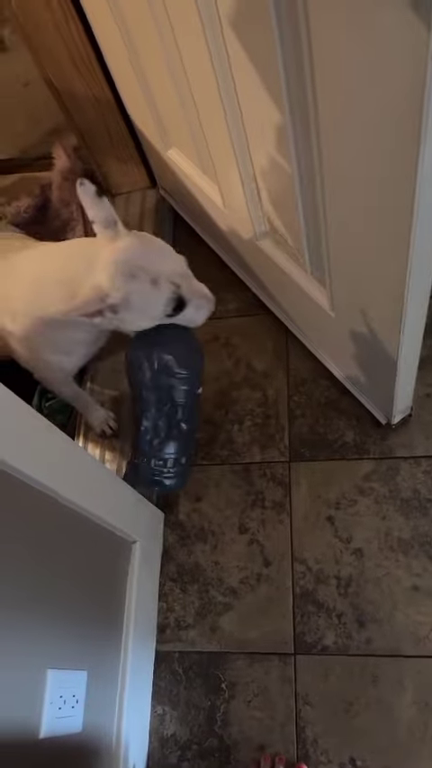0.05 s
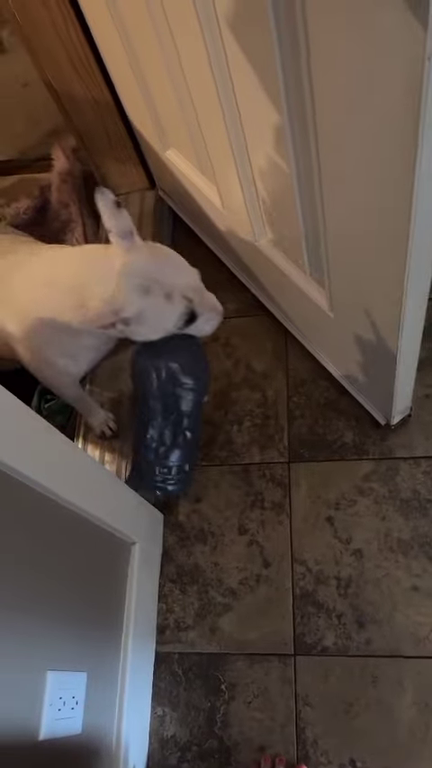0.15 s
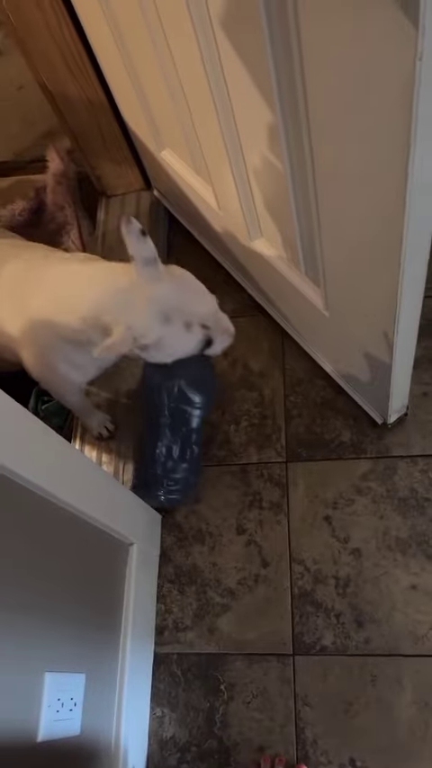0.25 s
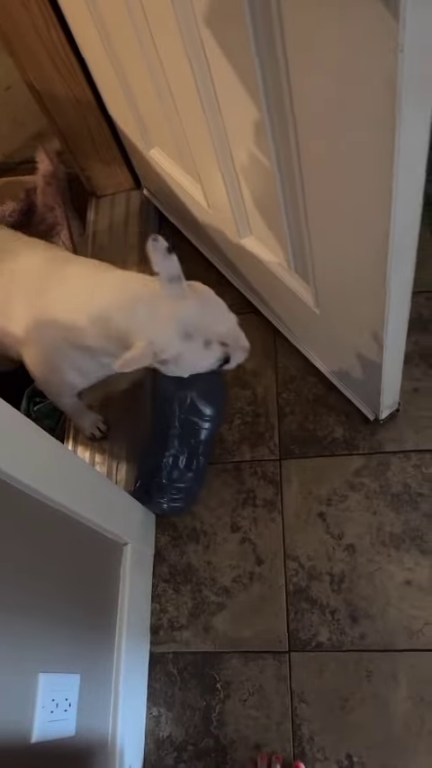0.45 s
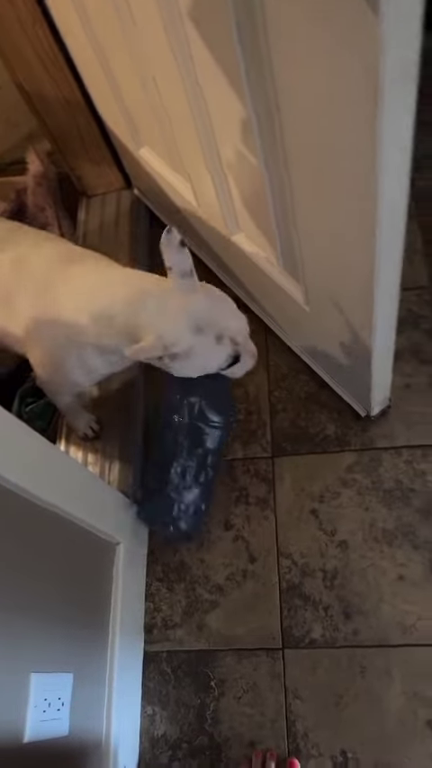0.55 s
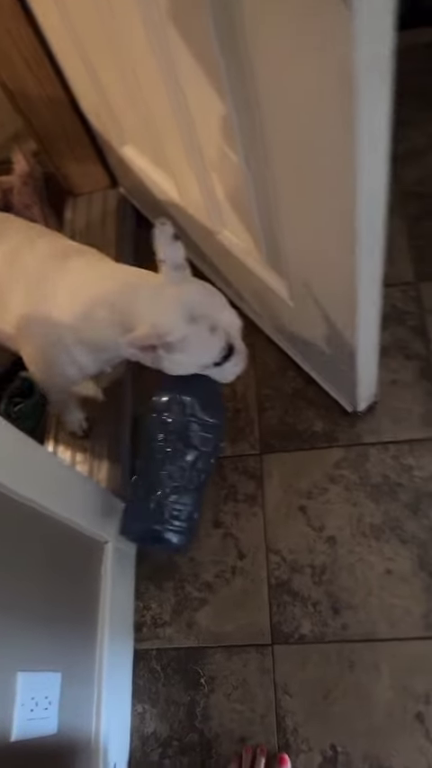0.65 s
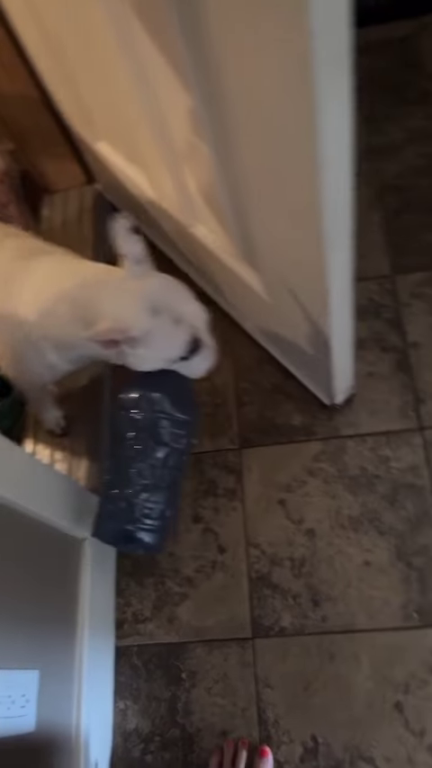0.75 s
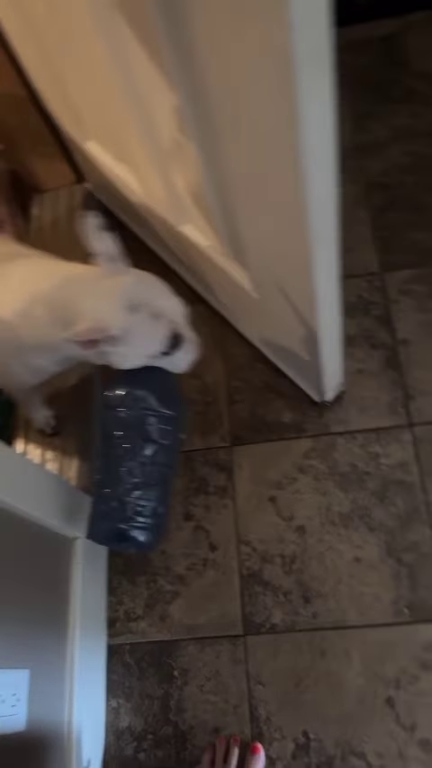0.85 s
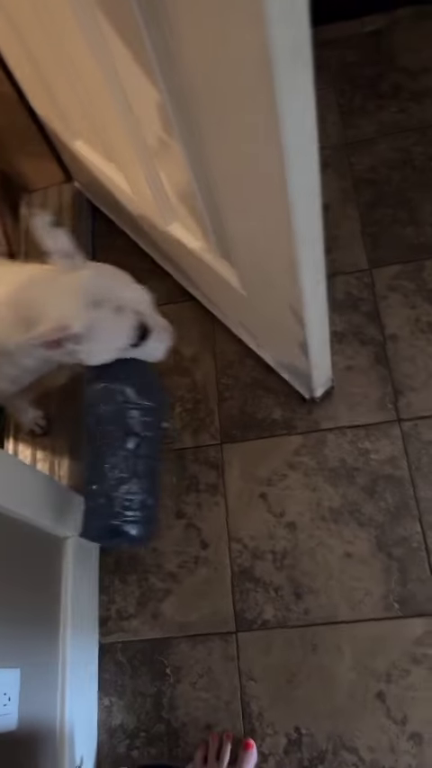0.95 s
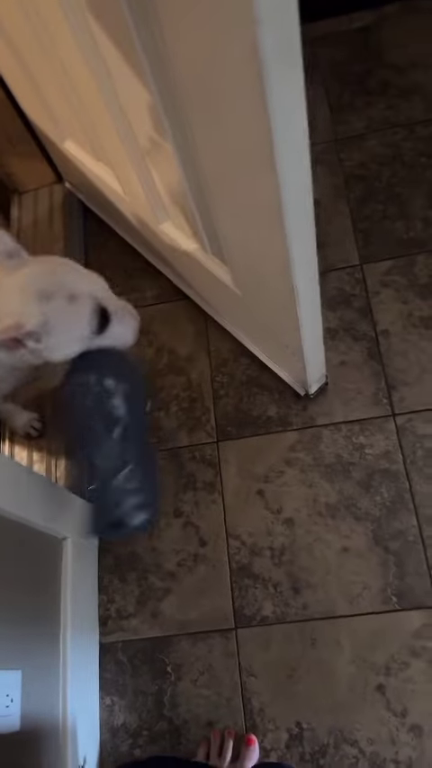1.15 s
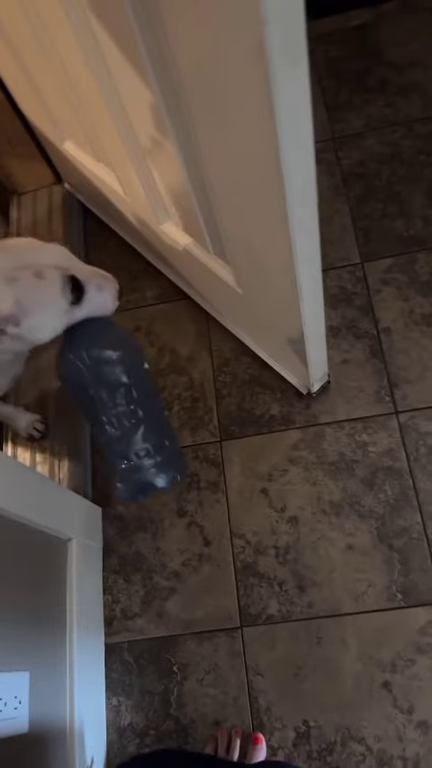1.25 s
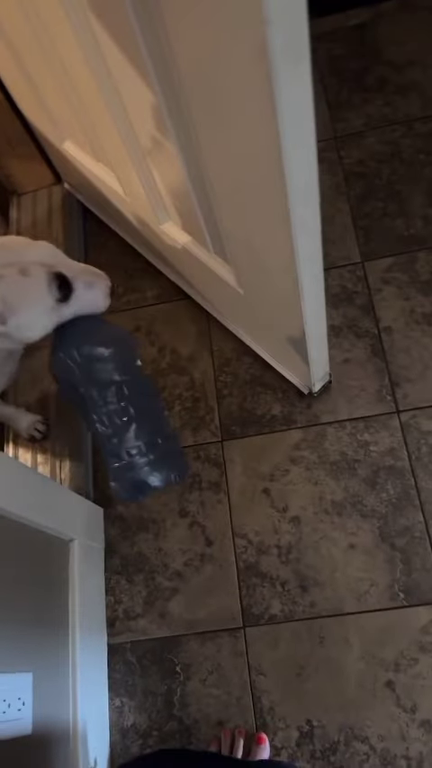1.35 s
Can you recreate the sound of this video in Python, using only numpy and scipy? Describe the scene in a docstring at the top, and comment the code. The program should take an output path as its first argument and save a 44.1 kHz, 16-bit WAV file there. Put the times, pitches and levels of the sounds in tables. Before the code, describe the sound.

A hollow plastic jug judders and scrapes through a door gap, then bangs the door loudly

```python
"""A hard tiled hallway: a dog drags a big hollow plastic jug through the gap by a door.
Stick-slip pulses ring the jug as it judders on the edge; wobbles and bumps ring modes over noise thuds.
Filtered noise bursts crack and snap; a soft slide, claw ticks and gliding squeaks follow.
The room rings in decaying noise over a low household rumble and the tail of an earlier knock."""
import sys
import numpy as np
from scipy import signal
from scipy.fft import rfft, irfft
from scipy.io import wavfile

SR = 44100
rng = np.random.default_rng(int(sys.argv[2]) if len(sys.argv) > 2 else 0)


def wav_out(sig):
    """Save sig, one row per channel (or a flat mono array), as 16-bit PCM at SR to the path in sys.argv[1]."""
    wavfile.write(sys.argv[1], SR, np.round(np.clip(np.atleast_2d(sig).T, -1, 1) * 32767).astype(np.int16))


N = 61739

# grip of the jug on the edge: time_s, level_db
DRAG_LEVEL = [(0, -69), (.11, -46), (.14, -32), (.18, -33), (.22, -20.5), (.26, -21), (.33, -24.5),
              (.37, -18.5), (.43, -46), (.47, -38), (.53, -48), (.556, -26.5), (.62, -26.5), (.66, -80.5)]
# resonances of the rubbed jug before bending: freq_hz, width_hz, gain_db
RUB_MODES = [(246.8, 19, -3), (380, 37.5, 1.5), (433.4, 33, 0), (478.8, 35, 0.5), (658, 33, -5),
             (780, 20, -9.5), (1003, 43, -20), (1187, 31, -17), (1786, 32, -18.5), (1945, 150, -26.5),
             (2437, 54, -22), (2790, 25, -38)]
# pulling bends the jug and shifts its resonances: time_s, pitch_ratio
BEND_RATIO = [(.13, .96), (.2, 0.99), (.26, 1.034), (.3, 1.015), (.34, 0.99), (.4, 1.02)]
# grit colour: freq_hz, relative_db_per_hz
GRIT_SPECTRUM = [(60, 10), (300, 7), (800, -10), (1150, -2), (1500, -8.5), (1850, -36), (2500, -7.5),
                 (3200, -11.5), (4500, -18), (8000, -26), (15000, -30)]
# gritty rasp: time_s, level_db
RASP_LEVEL = [(0, -68), (.125, -47), (.14, -50), (.18, -38.5), (.22, -35), (.28, -34.5), (.32, -38.5),
              (.35, -29.5), (.39, -44.5), (.43, -38), (.46, -56.5), (.538, -44), (.553, -30.5), (.6, -32),
              (.66, -38), (.73, -55), (.76, -52), (.84, -92.5)]
# median slip rate before bending; log-normal interval spread
SLIP_HZ, SLIP_JITTER, SLIP_SCATTER_DB, GRIT_T60_S = 149.45, .28, 3, 0.14


def scrape():
    """Uneven stick-slip pulses ring the hollow jug as it bends; each slip sheds a little grit."""
    t = clock()
    chance = rng.standard_normal(size=(400, 2))
    slip_s = np.cumsum(np.exp(SLIP_JITTER * chance[:, 0]) / SLIP_HZ)
    slip_gain = undb(SLIP_SCATTER_DB * chance[:, 1])
    slips = np.bincount((slip_s * SR).astype(int), slip_gain, N)[:N]

    shell = 0
    for k, (freq_hz, width_hz, gain_db) in enumerate(RUB_MODES):
        mode = np.exp(-np.pi * width_hz * t) * np.cos(2 * np.pi * freq_hz * t)
        shell = shell + (-1) ** k * undb(gain_db) * width_hz * mode
    lowpass = signal.butter(2, 3500, fs=SR, output="sos")
    body = unit(convolve(slips, signal.sosfilt(lowpass, shell)))
    # reading faster or slower shifts the pitch
    read_s = np.cumsum(np.interp(t, *np.array(BEND_RATIO).T)) / SR
    body = np.interp(read_s, t, body)

    grit = unit(grainy_noise(GRIT_SPECTRUM) * convolve(slips, fade(0, GRIT_T60_S)))
    return grit * level(RASP_LEVEL) + body * level(DRAG_LEVEL)


# the jug wobbles: start_s, ring_db, thud_db
JUG_WOBBLES = [(.336, -28, -20.5), (.3495, -21.5, -22.5), (.3735, -14.5, -31.5), (.3935, -15, -18.5),
               (.436, -32, -46), (.486, -36, -25.5)]
# jug resonances: freq_hz, gain_db, t60_s
JUG_RING_MODES = [(65.6, -16, 0.48), (92.6, -16.5, 0.71), (210.2, -5.5, 0.25), (260.8, -2, 0.41),
                  (326, 2, 0.25), (391, -1, 0.15), (455.4, -4, 0.23), (465, 4, 0.11), (575, -7.5, 0.316),
                  (666.6, -13, 0.32)]
# jug thud colour: freq_hz, relative_db_per_hz
JUG_THUD_SPECTRUM = [(30, -35.5), (55, -5), (80, -18), (150, -1), (270, -1), (450, -9.5), (700, -23.5),
                     (880, -24.5), (1100, -27.5), (1500, -39), (4000, -52)]


def jug_wobbles():
    """The freed jug rings in its own hollow modes."""
    return knocks(JUG_WOBBLES, JUG_RING_MODES, JUG_THUD_SPECTRUM, thud_t60_s=0.42)


# the jug bumps the door: start_s, ring_db, thud_db
BUMP_BLOWS = [(.5745, -11.5, -11.5), (.6058, -38, -14.5), (.624, -28.5, -14.5), (.672, -44.5, -26.5),
              (.73, -37, -34.5)]
# resonances of door and hollow jug together, the strongest a close pair that beats:
# freq_hz, gain_db, t60_s
BUMP_RING_MODES = [(87.7, -15, 0.65), (156.1, -1, 0.45), (229.3, -9, 0.42), (233.3, -12, 0.77),
                   (287.6, -2, 0.45), (376.95, 3, 0.47), (389.2, 3.5, 0.36), (442.5, -4.5, 0.23),
                   (601.5, -6.5, 0.084), (669, -2, 0.23), (775.5, -12.5, 0.32)]
# bump thud colour: freq_hz, relative_db_per_hz
BUMP_THUD_SPECTRUM = [(30, -9), (65, -13), (140, 4), (300, 1), (450, -2.5), (660, -5.5), (880, -22.5),
                      (1150, -33), (1500, -31), (4000, -54.5)]


def door_bumps():
    """Blows of the jug on the door ring both bodies."""
    return knocks(BUMP_BLOWS, BUMP_RING_MODES, BUMP_THUD_SPECTRUM, thud_t60_s=0.34)


def knocks(blows, modes, spectrum, thud_t60_s):
    """Soft blows ring the main modes over a noise thud standing for many short-lived ones."""
    ring, out = ringing(modes), 0
    for start_s, ring_db, thud_db in blows:
        thud = noise(over_pitch(spectrum, freqs())) * fade(start_s, thud_t60_s)
        blow = undb(ring_db) * delayed(ring, start_s) + undb(thud_db) * thud
        out = out + rise(start_s, 0.000097) * blow
    return out


# the plastic wall snaps: start_s, level_db, tilt_db_per_octave (above 900 Hz), t60_s
WALL_SNAPS = [(.362, -13.5, 5, 0.031), (0.5418, -22.5, -0.5, 0.014), (.5728, -16.5, -6, 0.015),
              (0.6095, -32.5, 0.5, 0.059), (0.619, -43, 18, 0.083)]
# snap colour before tilt: freq_hz, relative_db
SNAP_SPECTRUM = [(200, -15), (900, 4.5), (2200, -1), (3200, -1.5), (4500, -9.5), (6200, 0), (8200, -9),
                 (11000, -9), (15000, -19)]
# the plastic cracks against wood: start_s, crack_db, wall_ring_db
WOOD_CRACKS = [(.134, -45, -54), (0.193, -41, -36), (.342, -44, -43.5), (0.4865, -34, -37),
               (0.552, -27.5, -39.5), (0.5735, -18, -32.5), (0.592, -41, -31), (.612, -19.5, -16.5),
               (0.6185, -20, -32), (.66, -53, -50), (.724, -42.5, -43), (.731, -46, -51)]
# crack colour: freq_hz, relative_db_per_hz
CRACK_SPECTRUM = [(200, -21.5), (600, -4), (880, 8), (1150, 2), (1500, 8.5), (1850, -1), (2200, -3),
                  (2700, -14.5), (3400, -8), (4500, -13.5), (8000, -43), (15000, -42.5)]
SNAP_ATTACK_S, CRACK_T60_S = 0.0009, 0.02


def snaps():
    """Short noise bursts: cracks against wood, and snaps of the plastic tilted bright or dull."""
    hz, out = freqs(), 0
    for start_s, crack_db, _ in WOOD_CRACKS:
        crack = noise(over_pitch(CRACK_SPECTRUM, hz))
        out = out + undb(crack_db) * crack * fade(start_s, CRACK_T60_S)
    for start_s, level_db, tilt_db, t60_s in WALL_SNAPS:
        snap = noise(over_pitch(SNAP_SPECTRUM, hz) + tilt_db * np.log2(np.maximum(hz, 900)))
        out = out + undb(level_db) * snap * rise(start_s, SNAP_ATTACK_S) * fade(start_s, t60_s)
    return out


# short hollow ring of the plastic wall: freq_hz, gain_db, t60_s
WALL_RING_MODES = [(1148, -7, .058), (1298, -12.5, 0.12), (1888, -6, 0.025), (2174, -2, 0.019),
                   (2594, -14, 0.046)]


def wall():
    """Every crack rings the thin plastic wall."""
    ring = ringing(WALL_RING_MODES)
    return sum(undb(ring_db) * delayed(ring, start_s) for start_s, _, ring_db in WOOD_CRACKS)


# the freed jug slides over the tiles: time_s, level_db
SLIDE_LEVEL = [(0, -110), (.62, -95), (0.698, -56), (0.819, -54.5), (.95, -60), (1.1, -55.5), (1.15, -80.5),
               (1.4, -82)]
# slide colour: freq_hz, relative_db_per_hz
SLIDE_SPECTRUM = [(300, 5), (520, 15.5), (900, 6), (2000, -1), (2700, -2.5), (3700, -0.5), (4500, -12.5),
                  (8000, -26), (15000, -40)]


def slide():
    """Faint gritty hiss of plastic on tile."""
    mid, side = (unit(grainy_noise(SLIDE_SPECTRUM)) * level(SLIDE_LEVEL) for _ in range(2))
    return stereo(mid, undb(-5) * side)


# claws and light touches of plastic: start_s, level_db, centre_hz, half_width_octaves, t60_s
CLAW_TICKS = [(0.972, -54, 3150, 0.39, 0.055), (1.032, -60, 11900, 1.6, 0.15),
              (1.051, -55, 12000, 1.3, 0.07), (1.0777, -39, 12500, 1.03, 0.021),
              (1.088, -49.5, 8450, 0.49, 0.088), (1.118, -53.5, 12000, 1.7, 0.044),
              (1.191, -56.5, 2370, 0.57, 0.05), (1.214, -51.5, 6000, 0.77, 0.032),
              (1.222, -51, 1310, 0.62, 0.14), (1.251, -63, 7200, 0.54, .06), (1.33, -58.5, 2900, 0.6, 0.07),
              (1.343, -62, 6700, 0.27, 0.026)]
TICK_ATTACK_S = 0.00068


def ticks():
    """Small contacts, each a noise burst in its own band."""
    out = 0
    for start_s, level_db, centre_hz, width_oct, t60_s in CLAW_TICKS:
        offset = np.log2(freqs() / centre_hz) / width_oct
        tick = noise(-10 * np.log10(1 + offset ** 4))
        out = out + undb(level_db) * tick * rise(start_s, TICK_ATTACK_S) * fade(start_s, t60_s)
    return out


# the plastic squeaks on the tile: start_s, level_db, pitch_hz, glide_octaves_per_s, t60_s
TILE_SQUEAKS = [(1.192, -40, 2884, -5, 0.035), (1.214, -46, 1780, 8, 0.06), (1.218, -43, 2100, -1, 0.041),
                (1.225, -50.5, 1516, 4, 0.15)]
SQUEAK_ATTACK_S, WAVER_RMS_RATIO, WAVER_CUTOFF_HZ = 0.003, 0.055, 500


def squeaks():
    """Brief, slightly unsteady tones that glide as the plastic slips."""
    t, out = clock(), 0
    for start_s, level_db, pitch_hz, glide, t60_s in TILE_SQUEAKS:
        waver = noise(-10 * np.log10(1 + (freqs() / WAVER_CUTOFF_HZ) ** 4))
        glided_hz = pitch_hz * 2 ** (glide * np.clip(t - start_s, 0, t60_s))
        phase = 2 * np.pi * np.cumsum(glided_hz * (1 + WAVER_RMS_RATIO * waver)) / SR
        envelope = rise(start_s, SQUEAK_ATTACK_S) * fade(start_s, t60_s)
        out = out + undb(level_db) * np.sin(phase) * envelope
    return out


# decay of the room tail: freq_hz, t60_s
TAIL_T60 = [(100, 0.07), (500, 0.68), (2500, 0.8), (6000, 0.92), (14000, 0.2)]
EARLY_DB, EARLY_T60_S = 14.5, 0.085


def hallway():
    """One diffuse response: close reflections off door and tiles, then a longer tail."""
    out, white = 0, rfft(rng.standard_normal(N))
    octave = np.log2(np.clip(freqs(), 128, 16384))
    early = undb(EARLY_DB) * fade(0.0017, EARLY_T60_S)
    for k in range(7, 15):  # octave bands, 128 Hz to 16 kHz
        band = irfft(white * np.maximum(1 - abs(octave - k), 0), N)
        tail = fade(0.006, over_pitch(TAIL_T60, 2 ** k))
        out = out + band * (tail + early)
    return out / np.sqrt(np.sum(out ** 2))


def in_room(x, room, room_db, side_db, pan_db):
    """A sound with its reflections from ahead and from the sides."""
    mid = x + undb(room_db) * convolve(x, room[0])
    return stereo(mid, undb(side_db) * convolve(x, room[1]), pan_db)


# household rumble colour: freq_hz, relative_db_per_hz
RUMBLE_SPECTRUM = [(25, -5.5), (45, -19.5), (60, 2.5), (85, -8), (120, -7.5), (180, -8), (260, -6),
                   (380, -18.5), (700, -24.5), (1200, -37.5), (3000, -47.5), (6000, -60), (15000, -62.5)]
# lingering ring of an earlier knock: freq_hz, relative_db_per_hz
LINGER_SPECTRUM = [(50, 9.5), (190, -6.5), (245, 14.5), (290, -4.5), (400, -0.5), (1000, -13.5),
                   (3000, -22), (6000, -24), (11000, -28), (15000, -56.5)]
RUMBLE_DB, LINGER_DB, LINGER_T60_S = -39.5, -31, 0.38


def background():
    """Steady low noise of the house and the decaying noise of an earlier knock."""
    channels = []
    for _ in range(2):
        rumble = undb(RUMBLE_DB) * noise(over_pitch(RUMBLE_SPECTRUM, freqs()))
        linger = undb(LINGER_DB) * noise(over_pitch(LINGER_SPECTRUM, freqs()))
        channels.append(rumble + linger * fade(0, LINGER_T60_S))
    mid, side = channels
    return stereo(mid, undb(-0.5) * side, pan_db=-1)


# stereo width: freq_hz, side_db
SIDE_WIDTH = [(60, -22), (200, -17), (330, -13), (550, -3), (2000, -3), (12000, 0.5)]


def stereo(mid, side, pan_db=0):
    """Left and right; the bass is nearly the same in both, positive pan favours left."""
    side = colour(side, over_pitch(SIDE_WIDTH, freqs()))
    return np.array([mid + side, mid - side]) * undb(np.array([[pan_db], [-pan_db]]) / 2)


def ringing(modes):
    """Response to one blow: decaying sines of alternating sign."""
    t, out = clock(), 0
    for k, (freq_hz, gain_db, t60_s) in enumerate(modes):
        out = out + (-1) ** k * undb(gain_db) * fade(0, t60_s) * np.sin(2 * np.pi * freq_hz * t)
    return out


GRAIN_S, GRAIN_SPREAD_DB = 0.002, 4


def grainy_noise(spectrum):
    """Rubbed surface: coloured noise with a new random strength for every tiny catch."""
    grain = np.floor(clock() / GRAIN_S).astype(int)
    strength = undb(GRAIN_SPREAD_DB * rng.standard_normal(N)[grain])
    return colour(rng.standard_normal(N) * strength, over_pitch(spectrum, freqs()))


def undb(db):
    """Decibels to gain."""
    return 10 ** (np.asarray(db) / 20)


def unit(x):
    """Scale to rms 1."""
    return x / np.sqrt(np.mean(x ** 2))


def clock():
    """Time of every sample, s."""
    return np.arange(N) / SR


def freqs():
    """Frequency of every spectral bin, Hz, at least 1."""
    return np.maximum(np.arange(N // 2 + 1) * SR / N, 1)


def over_pitch(points, hz):
    """Read a table on a log-frequency axis."""
    f, v = np.array(points).T
    return np.interp(np.log(hz), np.log(f), v)


def level(points):
    """Gain over time from time_s, level_db points."""
    return undb(np.interp(clock(), *np.array(points).T))


def colour(x, db):
    """Filter by a gain per bin."""
    return irfft(rfft(x) * undb(db), N)


def noise(db):
    """Noise of rms 1 with the given spectrum."""
    return unit(colour(rng.standard_normal(N), db))


def fade(start_s, t60_s):
    """Sudden start and exponential decay."""
    age_s = clock() - start_s
    return (age_s >= 0) * np.exp(-np.log(1000) * np.maximum(age_s, 0) / t60_s)


def rise(start_s, attack_s):
    """Soft exponential onset of a contact."""
    return 1 - np.exp(-np.maximum(clock() - start_s, 0) / attack_s)


def delayed(x, start_s):
    """A sound moved to its starting time."""
    return np.interp(clock() - start_s, clock(), x, left=0)


def convolve(x, response):
    """Pass a sound through a response."""
    return signal.fftconvolve(x, response)[:N]


BODY_PAN_DB, CLICK_PAN_DB = -0.34, 0.6
RUB_ROOM_DB, BODY_ROOM_DB, BODY_SIDE_DB, CLICK_ROOM_DB, CLICK_SIDE_DB = -2, -8, -4.5, -8, -3.5


def scene():
    """Scrape, knocks and clicks in the hallway, over the slide and the background."""
    room = hallway(), hallway()
    rub = in_room(scrape(), room, RUB_ROOM_DB, RUB_ROOM_DB, BODY_PAN_DB)
    bodies = in_room(jug_wobbles() + door_bumps(), room, BODY_ROOM_DB, BODY_SIDE_DB, BODY_PAN_DB)
    small = snaps() + wall() + ticks() + squeaks()
    clicks = in_room(small, room, CLICK_ROOM_DB, CLICK_ROOM_DB, CLICK_PAN_DB)
    # independent noise in the side widens the clicks
    spread = stereo(np.zeros(N), undb(CLICK_SIDE_DB) * (snaps() + ticks()))
    return rub + bodies + clicks + spread + slide() + background()


def record(dry):
    """Drop the deepest bass, round the highest peaks and cut the top."""
    highpass = signal.butter(3, 40, "high", fs=SR, output="sos")
    lean = signal.sosfilt(highpass, dry)
    rounded = lean / (1 + (lean / .92) ** 8) ** (1 / 8)
    lowpass = signal.ellip(10, .2, 80, 15450, fs=SR, output="sos")
    return signal.sosfilt(lowpass, rounded)


dry = scene()
out = record(dry)
wav_out(out)
```